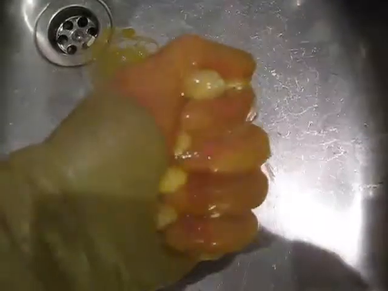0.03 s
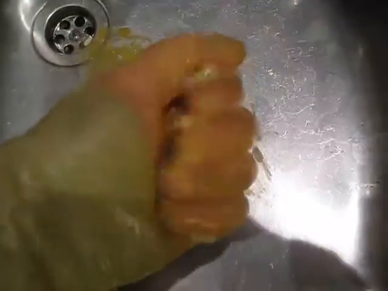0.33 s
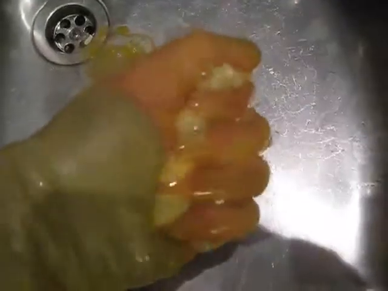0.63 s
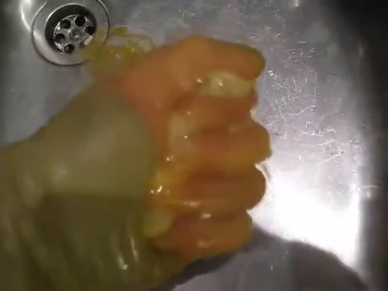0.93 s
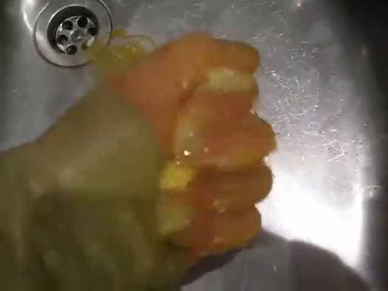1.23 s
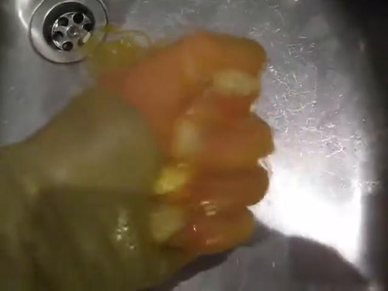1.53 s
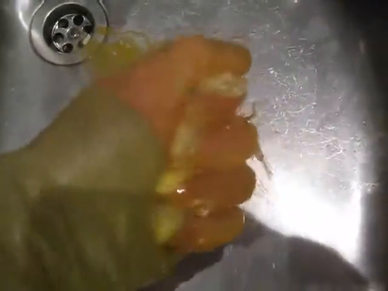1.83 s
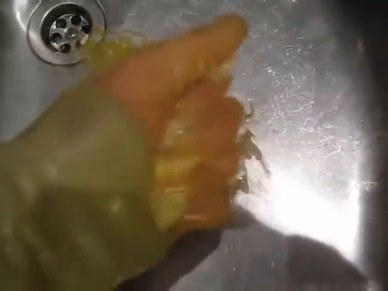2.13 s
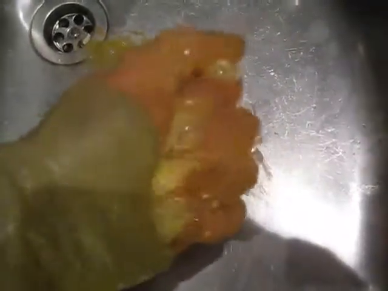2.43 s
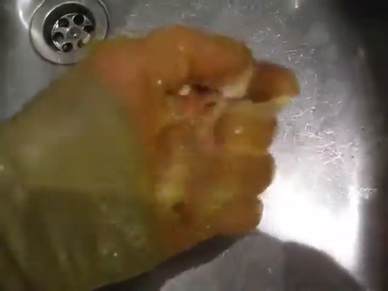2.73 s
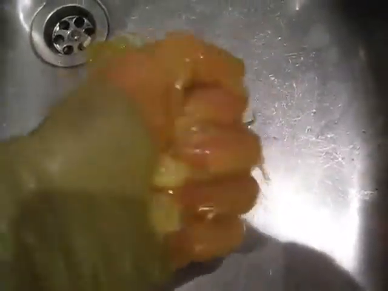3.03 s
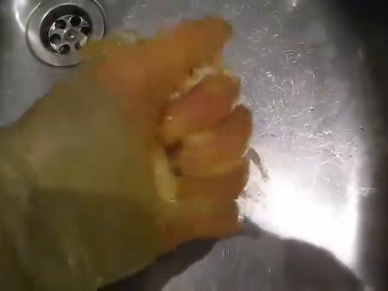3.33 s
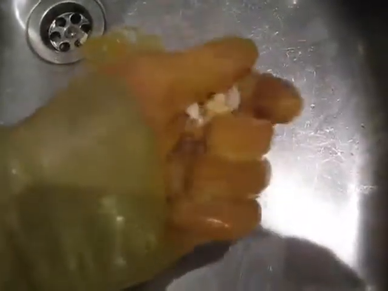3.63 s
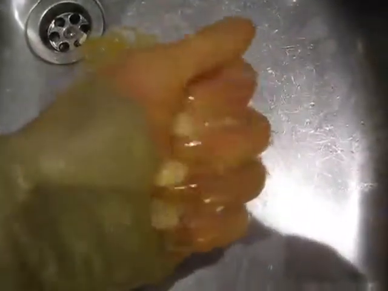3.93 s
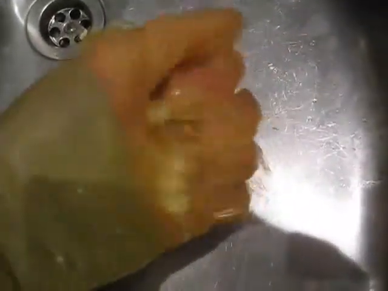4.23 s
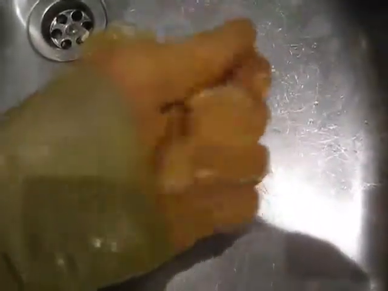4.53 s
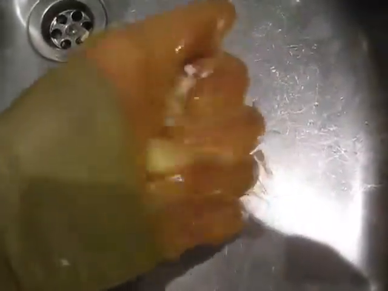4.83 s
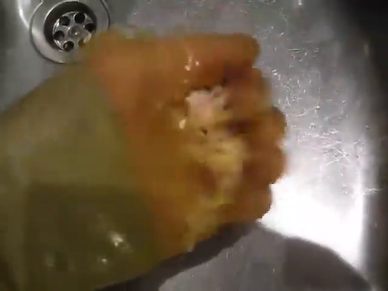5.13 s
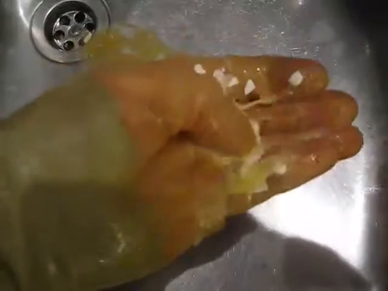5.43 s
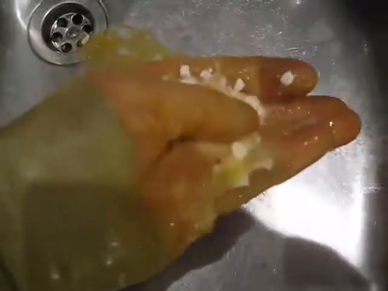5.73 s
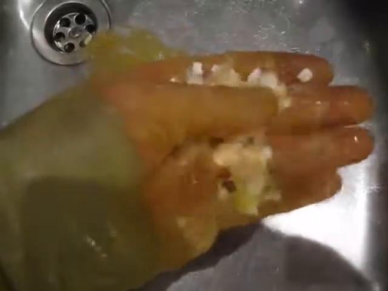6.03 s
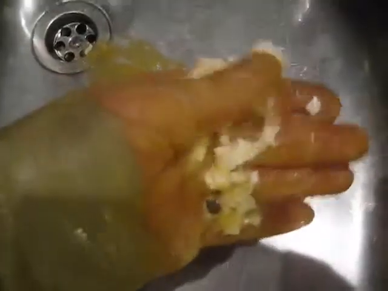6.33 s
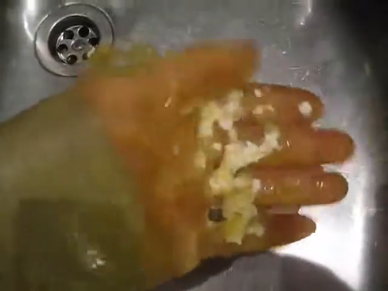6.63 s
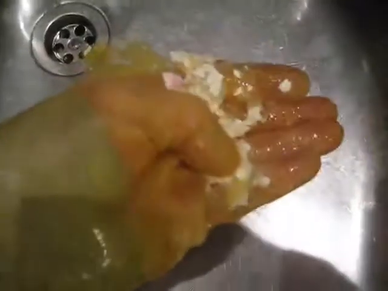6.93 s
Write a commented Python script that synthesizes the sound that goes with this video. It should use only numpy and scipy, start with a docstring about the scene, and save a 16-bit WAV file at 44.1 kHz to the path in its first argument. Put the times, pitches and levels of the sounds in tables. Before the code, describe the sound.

Close, wet squelching starts at once as a gloved hand repeatedly squeezes raw egg. Bubbly pops and sticky clicks mix with small crunches of shell, and a fine slimy fizz builds between the squeezes. Later two drops land very softly in the steel sink below. Near the end the crackling turns thinner and sparser. The basin adds a slight, quick echo in an otherwise quiet room.

```python
"""Wet squelching and crackling, close up: a gloved fist kneads a crushed raw egg over a steel sink.
Each squeeze forces air pockets through the slime, which pop in dense runs; sticky strands click,
wet films and bits of shell crackle between the fingers.
Two drops fall and ring the basin, which also echoes the hand's sounds into a quiet room."""
import sys
import numpy as np
from scipy import signal
from scipy.fft import rfft, irfft
from scipy.io import wavfile
from scipy.ndimage import uniform_filter1d

SR = 44100
rng = np.random.default_rng(int(sys.argv[2]) if len(sys.argv) > 2 else 0)


def master_out(mix):
    """Clip the mix to full scale and print it as 16-bit PCM to the path in sys.argv[1]."""
    frames = np.transpose(np.atleast_2d(mix))
    ceiling = np.clip(frames, -1, 1)
    pcm = np.round(ceiling * 32767).astype(np.int16)
    wavfile.write(sys.argv[1], SR, pcm)


N = 317079
CONTROL_HZ = 2000

# Spectrum of bursts in the slime. Each row: frequency in Hz, gain in dB.
SLIME_SPECTRUM = [(100, -37), (350, -33.5), (650, 6.5), (1100, 12), (2000, 12.5), (3200, 12.5), (4500, 8),
                  (6500, -3.5), (9000, -7.5)]
# Fizz between strokes, stronger once slime is smeared over the glove.
# Each row: time in seconds, relative level in dB.
FIZZ_CURVE = [(0.0, -63.0), (1.9, -63.0), (2.55, -50.0), (3.7, -52.0), (4.25, -47.0), (5.3, -54.5),
              (6.2, -49), (6.7, -57), (7.19, -45)]


def squelch(gain_db=0.21, ref_per_s=3900, ref_db=-30.5):
    """Small air pockets burst in a rasping spatter, louder and denser under a harder squeeze."""
    level_db, pocket_hz = airflow()
    per_s = ref_per_s * from_db(.25 * (level_db - ref_db))
    bubbles = grains(per_s, pocket_hz, band_hz=(650, 6800), q=2.7, spread_db=3, clump_db=9, pocket_db=7)
    return from_db(level_db + gain_db) * even_out(colour(bubbles, SLIME_SPECTRUM), window_s=.016)


def airflow(fizz_gain_db=2.5, resting_hz=2700, glide_octaves_per_s=-0.86):
    """Level (dB) and pocket pitch (Hz) of squeezes plus fizz; the strongest dominates the pitch."""
    # Air pushed through slime; a large pocket rings low.
    # Each row: start in seconds, hold in seconds, level in dB, pocket pitch in Hz.
    squeezes = [(0.0, 0.032, -26.0, 2470), (0.072, 0.021, -32.5, 2350), (0.211, 0.074, -32.5, 2700.0),
                (0.362, 0.063, -36.0, 1390), (0.419, 0.12, -23.5, 2570), (0.686, 0.014, -28.5, 3136),
                (0.919, 0.07, -39, 2521), (0.998, 0.025, -26.0, 2720), (1.022, 0.046, -19, 3160),
                (1.086, 0.015, -19.5, 2430), (1.1, 0.038, -25.5, 1950), (1.25, 0.057, -33.5, 1388),
                (1.397, 0.016, -31.5, 1170), (1.426, 0.026, -25.0, 2700.0), (1.449, 0.012, -14.5, 2620),
                (1.475, 0.056, -26.5, 2320), (1.619, 0.071, -33.5, 1130), (1.762, 0.028, -22.0, 1900),
                (1.802, 0.061, -29.0, 2270), (1.991, 0.075, -33.5, 2394), (2.179, 0.083, -28.0, 1493),
                (2.258, 0.075, -31.5, 2100), (2.457, 0.094, -29.0, 2145), (2.827, 0.12, -32.5, 3180),
                (2.961, 0.089, -34.5, 2777), (3.192, 0.081, -28.5, 2824), (3.397, 0.18, -40.0, 2490),
                (3.732, 0.12, -37.5, 1637), (3.88, 0.013, -19.5, 2700), (3.886, 0.075, -22.5, 2984),
                (3.957, 0.055, -28.0, 2802), (4.199, 0.08, -29, 3657), (4.419, 0.23, -36.5, 3267),
                (4.649, 0.053, -28.5, 3450), (4.847, 0.092, -32, 3270), (5.321, 0.19, -34, 3405),
                (5.585, 0.045, -28, 2920), (5.641, 0.17, -30.5, 2300), (6.011, 0.068, -35.0, 3107),
                (6.303, 0.085, -32, 4220), (6.83, 0.028, -43, 3330), (6.976, 0.19, -31, 2782)]
    t = np.arange(0, N / SR, 1 / CONTROL_HZ)
    power = from_db(np.interp(t, *np.transpose(FIZZ_CURVE)) + fizz_gain_db) ** 2
    weighted_octaves = power * np.log2(resting_hz)
    for s, hold_s, db, hz in squeezes:
        pressure = stroke(t, s, hold_s, attack_s=.004, sag_db_per_s=10, release_db_per_s=420)
        push = (from_db(db) * pressure) ** 2
        glide = glide_octaves_per_s * (np.clip(t - s, 0, hold_s) - hold_s / 2)
        power += push
        weighted_octaves += push * (np.log2(hz) + glide)
    return per_sample(np.c_[t, 10 * np.log10(power), 2 ** (weighted_octaves / power)])


def crackle(gain_db=4.5, per_s=5500, film_hz=10000):
    """Wet films and bits of shell fizz in clumps of tiny snaps."""
    # Each row: frequency in Hz, gain in dB.
    grit_spectrum = [(150, -43), (600, -24), (1200, 4), (2500, 11.5), (4500, 12), (7000, 8), (10800, 11),
                     (13000, 4), (16000, -7.5)]
    pitch_hz = np.full(N, film_hz)
    ticks = grains(per_s, pitch_hz, band_hz=(1000, 14500), q=3.2, spread_db=4, clump_db=6, pocket_db=4)
    return from_db(tearing() + gain_db) * even_out(colour(ticks, grit_spectrum), window_s=.027)


def tearing(fizz_gain_db=2.5):
    """Level (dB) of films tearing and grit shifting between the fingers, plus fizz."""
    # Each row: start in seconds, hold in seconds, level in dB.
    tears = [(0.21, 0.072, -37), (0.36, 0.072, -41.5), (0.689, 0.0084, -30.5), (0.92, 0.029, -43.5),
             (1.036, 0.025, -43), (1.287, 0.018, -37.5), (1.407, 0.047, -33.5), (1.639, 0.033, -36),
             (1.753, 0.025, -34), (2.023, 0.031, -31), (2.101, 0.058, -39), (2.196, 0.031, -29),
             (2.421, 0.15, -37), (2.549, 0.13, -39), (2.706, 0.072, -40), (2.847, 0.089, -33),
             (3.011, 0.059, -40), (3.148, 0.13, -36), (3.298, 0.24, -40), (3.741, 0.052, -32),
             (3.833, 0.063, -36.5), (4.029, 0.074, -39), (4.102, 0.18, -42), (4.426, 0.083, -41),
             (4.516, 0.044, -34.5), (4.579, 0.11, -34.5), (4.764, 0.0065, -34.5), (4.832, 0.15, -34.5),
             (4.981, 0.24, -43), (5.344, 0.028, -35.5), (5.358, 0.16, -36.5), (5.551, 0.17, -35),
             (5.7, 0.12, -44), (5.889, 0.025, -41.5), (6.086, 0.018, -32.5), (6.297, 0.097, -34),
             (6.492, 0.068, -40.5), (6.97, 0.19, -38.5)]
    t = np.arange(0, N / SR, 1 / CONTROL_HZ)
    power = from_db(np.interp(t, *np.transpose(FIZZ_CURVE)) + fizz_gain_db) ** 2
    for s, hold_s, db in tears:
        pressure = stroke(t, s, hold_s, attack_s=.00081, sag_db_per_s=11, release_db_per_s=424)
        power += (from_db(db) * pressure) ** 2
    return per_sample(np.c_[t, 10 * np.log10(power)])[0]


def stroke(t, start_s, hold_s, attack_s, sag_db_per_s, release_db_per_s, build_share=.45):
    """Gain of one finger movement: pressure builds, sags while held, then lets go."""
    age_s = np.maximum(t - start_s, 0)
    build = np.minimum(age_s / (attack_s + build_share * hold_s), 1)
    fall_db = sag_db_per_s * age_s + release_db_per_s * np.maximum(age_s - hold_s, 0)
    return build * from_db(-np.minimum(fall_db, 120))


def grains(per_s, pocket_hz, band_hz, q, spread_db, clump_db, pocket_db, pitch_count=24):
    """Tiny bubbles burst in clumps and ring briefly, loudest near their pocket's wavering pitch."""
    at = np.flatnonzero(rng.random(N) < per_s / SR)
    pitches_hz = np.geomspace(*band_hz, pitch_count)
    slot = rng.integers(0, pitch_count, len(at))
    octaves_off = np.log2(pitches_hz[slot] / pocket_hz[at]) + .3 * wander(at, per_s=40)
    size_db = spread_db * np.minimum(rng.exponential(1, len(at)), 4) + clump_db * wander(at, per_s=170)
    size_db += pocket_db * np.exp(-(octaves_off / .4) ** 2)
    size_db += pocket_db * np.clip(octaves_off + .8, -1, 0) / 2  # weak far below the pocket
    sizes = from_db(size_db) * rng.choice([-1, 1], len(at))
    return sum(resonate(np.bincount(at, sizes * (slot == k), N), hz, q)
               for k, hz in enumerate(pitches_hz))


def pops(gain_db=6, glide=.034, burst_db=-8.5, burst_t60_s=.011, tail_db=-27, tail_t60_s=.14):
    """A large pocket's skin bursts; it rings for a few rising cycles, then fades softly."""
    # Each row: start in seconds, relative level in dB, pitch in Hz.
    pockets = [(0.588, -22, 2100), (0.619, -23, 2830), (0.6983, -5, 3050), (1.1458, -8, 1900),
               (1.2694, -14, 2320), (1.3037, -16, 1164), (1.5033, -6, 2841), (1.7919, -3, 3400),
               (2.001, -16.5, 4290), (2.1404, -25, 1235), (2.252, -5, 3133), (3.026, -14.5, 2301)]
    t60_cycles, rise_s = 15, .00025
    out, t = np.zeros(N), seconds(tail_t60_s)
    for s, db, hz in pockets:
        age = t * hz / t60_cycles
        decay = from_db(-60 * age) + from_db(tail_db - 60 * t / tail_t60_s)
        tone = np.sin(2 * np.pi * hz * t * (1 + glide * np.minimum(age, 1))) * decay
        burst = colour(rng.standard_normal(len(t)) * from_db(-60 * t / burst_t60_s), SLIME_SPECTRUM)
        pop = tone + from_db(burst_db) * burst / np.abs(burst).max()
        add(out, s, from_db(db + gain_db) * pop * (1 - np.exp(-(t / rise_s) ** 2)))
    return cut_bass(out)


def strands(rise_cycles=.6, tick_db=-21):
    """A sticky strand lets go: a dry click at the pitch of the pocket behind it, with a faint tick."""
    # Each row: peak time in seconds, level in dB.
    releases = [(0.0843, -9.5), (0.4447, -7), (0.453, -2.5), (0.4603, -3), (0.4674, -7), (0.4766, -16),
                (0.4826, -14), (0.4961, -2), (0.5065, -7.5), (0.5157, -7), (1.0893, -14), (1.0959, -9),
                (1.142, -12), (1.4459, -9.5), (1.8372, -7), (1.8835, -9.5), (1.8912, -9.5), (1.8937, -6.5),
                (2.0467, -11.5), (2.853, -6.5), (2.9746, -10), (3.0925, -11), (3.9202, 0), (3.9224, -2.5),
                (4.246, -5.5), (4.6704, -6), (5.463, -4.5), (5.481, -4), (5.4935, -3.5), (5.5018, 2.5),
                (5.5172, -12), (5.5513, -7), (5.5695, -10.5), (5.665, -5.5), (5.6718, -5), (5.7041, -7),
                (5.7266, -5.5), (5.785, -12), (5.9042, -11), (6.9947, -6.5), (7.0361, -10), (7.0497, -5.5)]
    out, t = np.zeros(N), seconds(.004)
    _, pocket_hz = airflow()
    for s, db in releases:
        hz = pocket_hz[int(s * SR)]
        rise_s = rise_cycles / hz
        tone = np.sin(2 * np.pi * (hz * t + rng.random()))
        tick = from_db(tick_db) * rng.standard_normal(len(t))
        add(out, s - rise_s, from_db(db) * (tone + tick) * blip(t, rise_s))
    return cut_bass(out)


def crunches(gain_db=7.5, per_s=9000, spread_db=1.5, rise_s=.000061, t60_s=.03):
    """Shell crunches and slime spurts: a quick run of snaps swells and dies away."""
    # Each row: start in seconds, relative peak in dB.
    runs = [(0.2565, -20.5), (0.449, -13.5), (1.303, -13.5), (1.4797, -23.5), (1.6684, -14), (1.7807, -13),
            (2.0282, -16.5), (2.9292, -20), (3.252, -14.5), (3.8985, -14.5), (4.2168, -16), (4.263, -18),
            (4.5318, -16), (5.344, -14), (5.6092, -16.5), (5.6256, -16), (6.0919, -17.5)]
    # Each row: frequency in Hz, gain in dB.
    shard_spectrum = [(150, -38), (600, -4), (1200, -8.5), (3500, 7), (7000, -1), (11000, 10.5),
                      (13500, -3), (16000, -37.5)]
    out, t = np.zeros(N), seconds(.04)
    envelope = from_db(-60 * t / t60_s) * (1 - np.exp(-t / rise_s))
    for s, db in runs:
        clicks = (rng.random(len(t)) < per_s / SR) * rng.choice([-1, 1], len(t))
        sizes = from_db(rng.normal(0, spread_db, len(t)))
        burst = colour(clicks * sizes * envelope, shard_spectrum)
        add(out, s, from_db(db + gain_db) * burst / np.abs(burst).max())
    return out


def snaps(gain_db=1, rise_s=.00035, q=1.23):
    """A bit of shell breaks in one sharp tick; a smaller bit sounds higher."""
    # Each row: time in seconds, relative peak in dB, pitch in Hz.
    shell_bits = [(0.875, -17.5, 7300), (0.9106, -9.5, 9490), (2.654, -21, 10630), (2.7809, -15, 9970),
                  (2.8821, -6, 7460), (2.8827, -1.5, 10500), (2.9895, -7.5, 5470), (3.1784, -9, 10550),
                  (3.449, -5.5, 9580), (3.7909, -19, 8154), (4.0956, -8.5, 8180), (4.2661, -11, 7340),
                  (4.603, -11, 10470), (4.6194, -14.5, 4170), (4.7533, -15, 4870), (4.7678, -12.5, 6580),
                  (4.894, -11, 8840), (5.551, -11, 8500), (5.584, -9.5, 8400), (6.098, -13, 9660),
                  (6.2518, -20, 2920), (6.9833, -8.5, 7380), (7.0464, -8, 4500)]
    out, t = np.zeros(N), seconds(.004)
    for s, db, hz in shell_bits:
        tick = resonate(rng.standard_normal(len(t)) * blip(t, rise_s), hz, q)
        add(out, s - rise_s, from_db(db + gain_db) * tick / np.abs(tick).max())
    return out


def squirts(width_s=.0083, q=3.8):
    """A thin jet squeaks through a gap: a short swell of hiss, pitched by the gap."""
    # Each row: peak time in seconds, level in dB, pitch in Hz.
    jets = [(3.94, -24, 4718), (3.952, -17.5, 2530), (4.058, -20.5, 8994), (4.298, -19, 3986),
            (6.709, -38, 5620)]
    out, t = np.zeros(N), seconds(.03)
    swell = np.exp(-((t - t.mean()) / width_s) ** 2)
    for s, db, hz in jets:
        jet = unit_rms(resonate(rng.standard_normal(len(t)), hz, q))
        add(out, s - t.mean(), from_db(db) * jet * swell)
    return out


def overload_thuds(rise_s=.00017):
    """A dull low thud as the loudest pops overload the microphone."""
    # Each row: start in seconds, peak in dB.
    thuds = [(0.4953, -26), (1.791, -21), (2.881, -28), (5.5014, -21)]
    out, t = np.zeros(N), seconds(.01)
    for s, db in thuds:
        add(out, s, from_db(db) * t / rise_s * np.exp(1 - t / rise_s))
    return out


def palm(x, cut_hz=1490):
    """The hand opens flat and loses the low resonance of the fist."""
    # Each row: time in seconds, share open from 0 to 1.
    opening = [(5.55, 0), (6.0, 1)]
    opened, = per_sample(opening)
    thin = signal.sosfilt(signal.butter(2, cut_hz, "high", fs=SR, output="sos"), x)
    return (1 - opened) * x + opened * thin


def drops(reach_octaves=1.17):
    """Each drop rings the steel floor, most of all in the modes that its spot favours."""
    # Each row: start in seconds, level in dB, favoured pitch in Hz.
    landings = [(4.532, -52.5, 450.5), (5.346, -48, 312.1)]
    # Each row: frequency in Hz, gain in dB, t60 in seconds.
    floor_modes = [(305, 3.5, 0.62), (332.5, 3, 0.35), (382, 5.5, 0.52), (526, 3, 0.42), (557, 0, 0.76),
                   (745, 9, 0.47), (875, 6, 0.77)]
    out, t = np.zeros(N), seconds(.7)
    for s, db, spot_hz in landings:
        for hz, mode_db, t60_s in floor_modes:
            share = np.exp(-(np.log2(hz / spot_hz) / reach_octaves) ** 2 / 2)
            ring = np.sin(2 * np.pi * hz * t) * from_db(-60 * t / t60_s)
            add(out, s, share * from_db(db + mode_db) * ring)
    return out


def sink(x, room_db=-23, room_t60_s=.41):
    """Direct sound plus wall echoes, the ring of the basin's hollow and a faint room tail."""
    # Each row: frequency in Hz, gain in dB, t60 in seconds.
    hollow_modes = [(1166, -40.5, 0.039), (1626, -50.5, 0.054), (1933, -50, 0.078), (3580, -46, 0.013)]
    t = seconds(.4)
    room = from_db(room_db) * echo_tail(t, delay_s=.006, t60_s=room_t60_s)
    hollow = sum(from_db(db - 60 * t / t60_s) * np.cos(2 * np.pi * hz * t)
                 for hz, db, t60_s in hollow_modes)
    return x + walls(x) + signal.fftconvolve(x, room + hollow)[:N]


def walls(x, level_db=-9, hop=1024):
    """Quick echoes off the steel; the pattern keeps changing, as different spots in the hand sound."""
    out, t = np.zeros(N), seconds(.04)
    for i in range(0, N, hop):
        echoes = echo_tail(t, delay_s=.001, t60_s=.059)
        piece = x[i:i + 2 * hop]
        add(out, i / SR, signal.fftconvolve(piece * np.hanning(2 * hop)[:len(piece)], echoes))
    return from_db(level_db) * out


def room_tone(level_db=-52.5):
    """Steady hiss of the quiet room."""
    # Each row: frequency in Hz, relative density in dB.
    hiss_spectrum = [(25, -2.5), (60, -3), (150, -5.5), (400, -6.5), (1000, -9.5), (3000, -12), (6500, -23),
                     (10500, -22), (16000, -43)]
    return from_db(level_db) * unit_rms(colour(rng.standard_normal(N), hiss_spectrum))


def echo_tail(t, delay_s, t60_s):
    """Dense reflections: decaying noise of unit energy."""
    tail = rng.standard_normal(len(t)) * (t > delay_s) * from_db(-60 * t / t60_s)
    return tail / np.linalg.norm(tail)


def cut_bass(x, cut_hz=750):
    """Keep only what lies above the cut-off, so pops and clicks carry no low thump."""
    return signal.sosfilt(signal.butter(3, cut_hz, "high", fs=SR, output="sos"), x)


def even_out(x, window_s):
    """Neighbouring grains share one flow, so their joint power stays near 1."""
    size, x = max(int(window_s * SR), 2), unit_rms(x)
    local_power = uniform_filter1d(uniform_filter1d(x ** 2, size), size)
    return x / np.sqrt(local_power + .01)


def resonate(x, hz, q):
    """Two equal resonators in series, peak gain 1."""
    r = np.exp(-np.pi * hz / q / SR)
    b = np.array([1, 0, -1]) * (1 - r * r) / 2
    a = [1, -2 * r * np.cos(2 * np.pi * hz / SR), r * r]
    once = signal.lfilter(b, a, x + 1e-18)
    return signal.lfilter(b, a, once + 1e-18)


def colour(x, spectrum, size=4096):
    """Minimum-phase filter with the given spectrum."""
    hz, db = np.transpose(spectrum)
    grid_hz = np.maximum(np.arange(size // 2 + 1) * SR / size, 1)
    gain = from_db(np.interp(np.log(grid_hz), np.log(hz), db))
    cepstrum = irfft(np.log(gain))
    cepstrum[1:size // 2] *= 2
    cepstrum[size // 2:] = 0
    return signal.fftconvolve(x, irfft(np.exp(rfft(cepstrum))))[:len(x)]


def wander(at, per_s):
    """A value gliding to a new random level per_s times a second, read at the given samples."""
    knots = np.arange(0, N, SR / per_s)
    return np.interp(at, knots, rng.standard_normal(len(knots)))


def blip(t, rise_s):
    """Swell to 1 at rise_s and die away almost as fast."""
    return (t / rise_s * np.exp(1 - t / rise_s)) ** 2


def per_sample(rows):
    """Read each column of a time curve at every sample."""
    s, *columns = np.transpose(rows)
    return [np.interp(np.arange(N) / SR, s, column) for column in columns]


def add(out, start_s, sound):
    """Mix a sound in at start_s."""
    i = max(0, round(start_s * SR))
    out[i:i + len(sound)] += sound[:N - i]


def seconds(length_s):
    """A time axis."""
    return np.arange(int(length_s * SR)) / SR


def from_db(db):
    """Decibels to gain."""
    return 10 ** (np.asarray(db) / 20)


def unit_rms(x):
    """Scale to unit power."""
    return x / np.sqrt(np.mean(x ** 2) + 1e-20)


def scene():
    """The hand above the basin and two drops, over a quiet hiss."""
    egg = squelch() + crackle() + pops() + strands() + crunches() + snaps() + squirts()
    close_sound = palm(egg) + overload_thuds()
    hiss = room_tone()
    return (sink(close_sound) + drops() + hiss)[None]


def record(dry, notch_hz=7907, notch_width_hz=1840, ceiling=.72, cutoff_hz=16100):
    """The microphone port cancels one treble band; peaks are rounded and the top is cut."""
    ported = signal.lfilter(*signal.iirnotch(notch_hz, notch_hz / notch_width_hz, fs=SR), dry)
    rounded = ported / (1 + (ported / ceiling) ** 6) ** (1 / 6)
    return signal.sosfilt(signal.ellip(10, .1, 80, cutoff_hz, fs=SR, output="sos"), rounded)


dry = scene()
out = record(dry)
master_out(out)
```